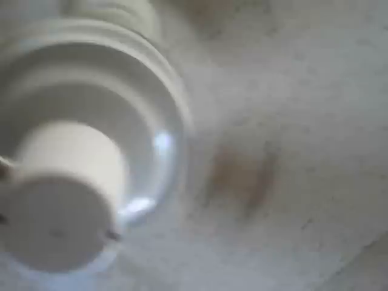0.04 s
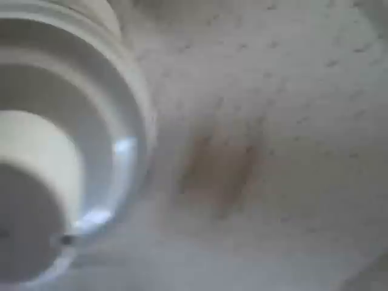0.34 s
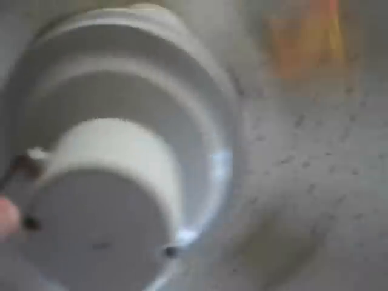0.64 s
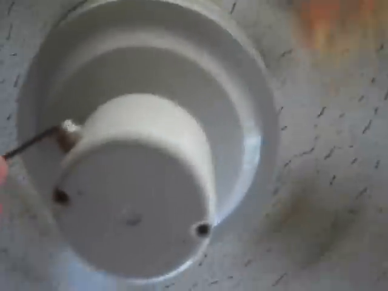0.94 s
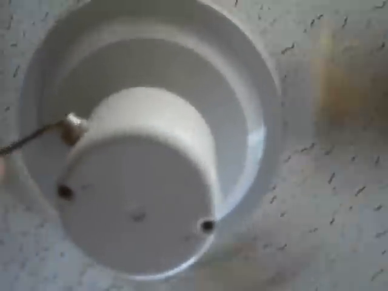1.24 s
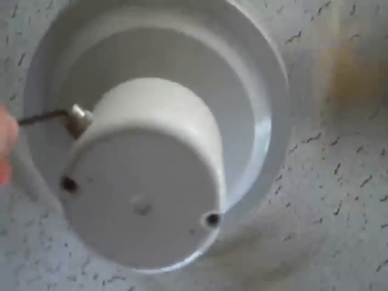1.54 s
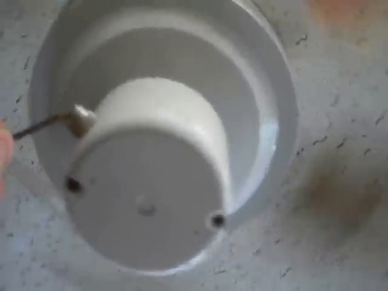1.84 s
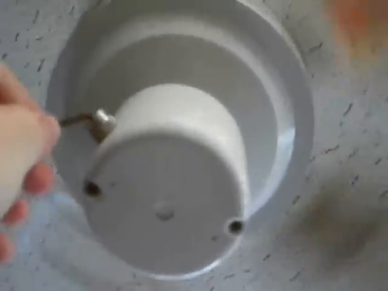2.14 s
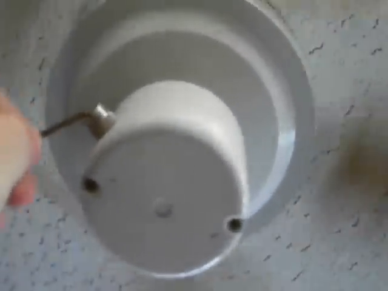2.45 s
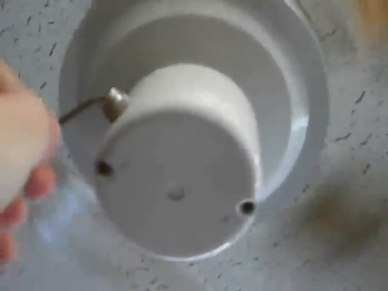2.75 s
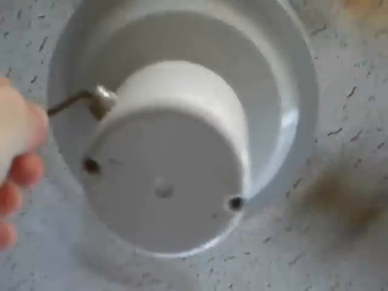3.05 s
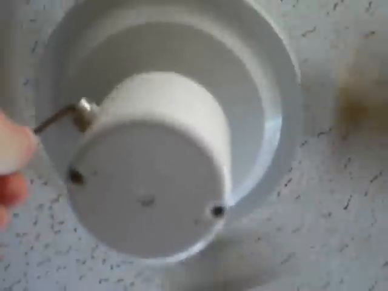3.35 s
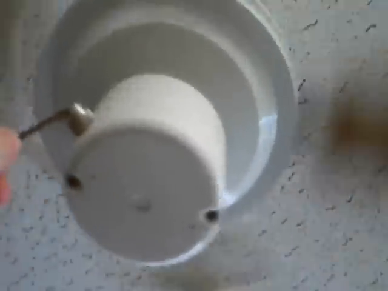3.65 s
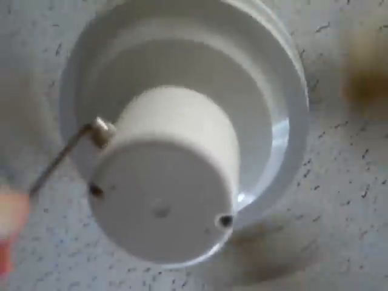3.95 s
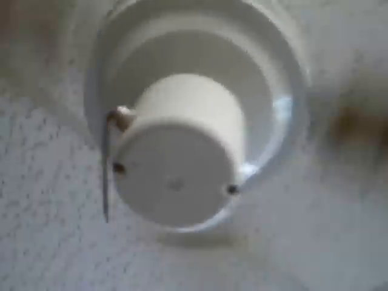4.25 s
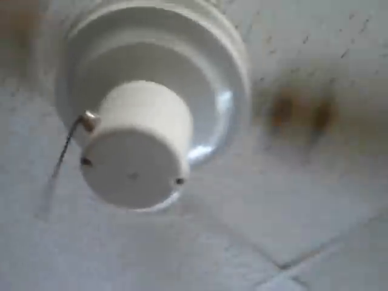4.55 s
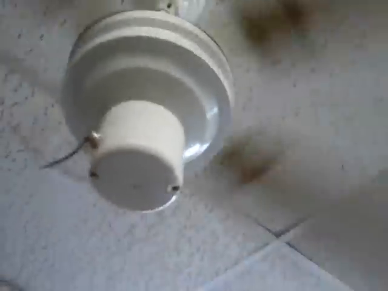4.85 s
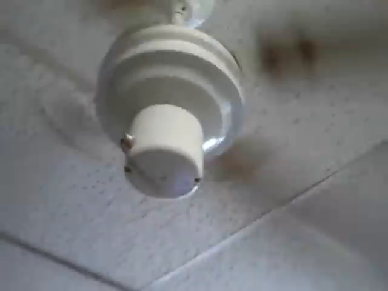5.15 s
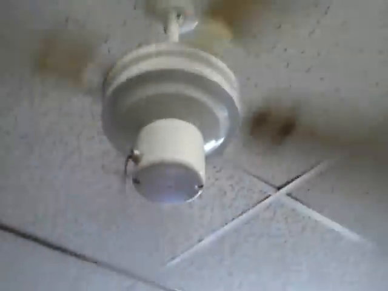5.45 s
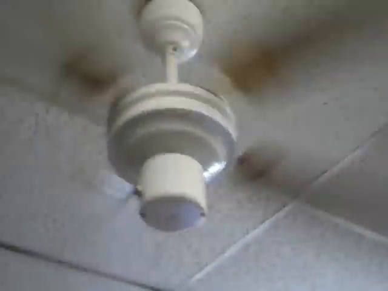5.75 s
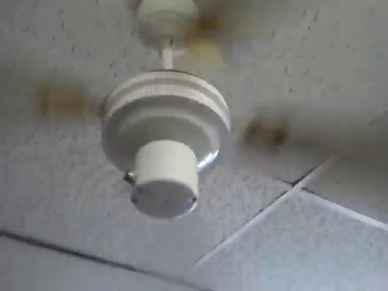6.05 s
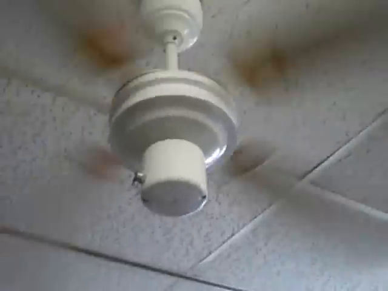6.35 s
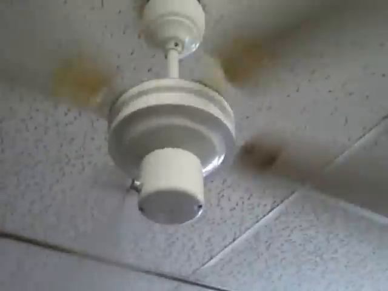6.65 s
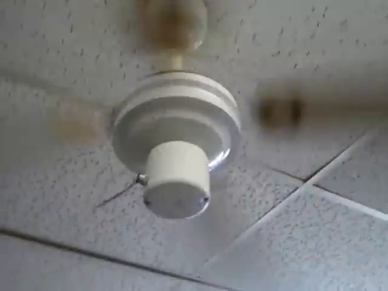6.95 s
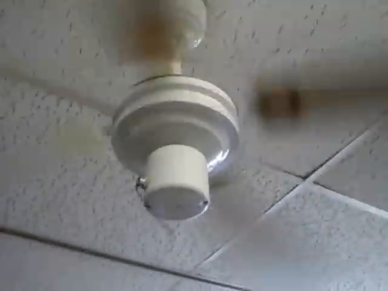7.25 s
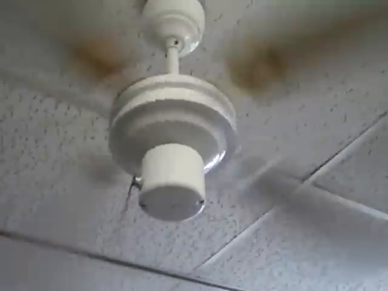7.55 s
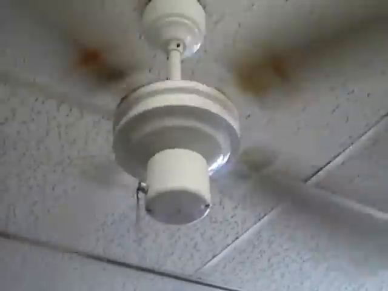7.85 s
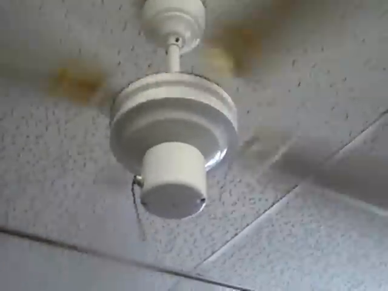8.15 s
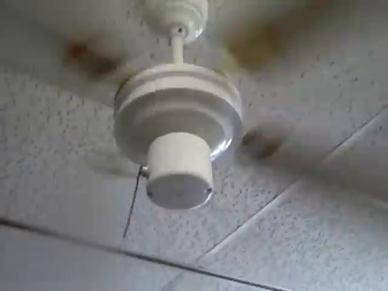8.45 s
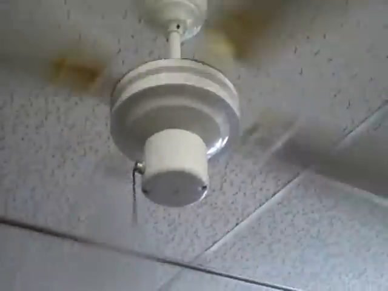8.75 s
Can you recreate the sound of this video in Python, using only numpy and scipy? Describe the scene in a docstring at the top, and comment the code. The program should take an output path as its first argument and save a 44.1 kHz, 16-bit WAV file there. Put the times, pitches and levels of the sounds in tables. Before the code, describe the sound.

Six sharp, briefly ringing clicks come in quick succession from the pull-chain switch of a running ceiling fan, close overhead in a small room. Beneath them the blades make a constant airy rush, and gusts thump softly on the cheap, slightly gritty microphone. A few faint chain ticks follow on the metal housing. The wind rumble then drops, leaving the even noise of moving air.

```python
"""A ceiling fan spins just above the microphone, in a small room with a tiled ceiling.
The blades rush steadily, and their downdraught buffets the microphone until it is drawn away.
Close overhead, a hand tugs the pull chain and the switch in the metal housing snaps six times.
Let go, the chain swings and ticks faintly against the housing."""
import sys
import numpy as np
from scipy import signal
from scipy.fft import rfft, irfft
from scipy.io import wavfile

SR = 44100
rng = np.random.default_rng(int(sys.argv[2]) if len(sys.argv) > 2 else 0)


def wav_out(sig):
    """Save sig, one row per channel (or a flat mono array), as 16-bit PCM at SR to the path in sys.argv[1]."""
    wavfile.write(sys.argv[1], SR, np.round(np.clip(np.atleast_2d(sig).T, -1, 1) * 32767).astype(np.int16))


N = 388521
TIME = np.arange(N) / SR


def from_db(db):
    """Decibels to gain."""
    return 10 ** (np.asarray(db) / 20)


def rms_one(x):
    """Scale to rms 1."""
    return x / np.sqrt(np.mean(x ** 2) + 1e-20)


def unit_energy(x):
    """Scale to energy 1."""
    return x / np.sqrt(np.sum(x ** 2) + 1e-20)


def in_time(rows):
    """Each column of a timed curve at every sample."""
    times, *columns = np.transpose(rows)
    return np.squeeze([np.interp(TIME, times, column) for column in columns])


def at_hz(points, hz):
    """Read a table on a log-frequency axis."""
    pitches, values = np.transpose(points)
    return np.interp(np.log(np.maximum(hz, 1)), np.log(pitches), values)


def nearness(hz, centre_hz, octaves):
    """A bell curve over pitch, 1 at its centre."""
    return np.exp(-(np.log2(hz / centre_hz) / octaves) ** 2)


def band(x, low_hz, high_hz, order=2):
    """Butterworth band-pass."""
    return signal.sosfilt(signal.butter(order, [low_hz, high_hz], "band", fs=SR, output="sos"), x)


def ring(x, hz, width_hz):
    """A resonance; a unit click sets a wave of height about 1 ringing."""
    radius, angle = np.exp(-np.pi * width_hz / SR), 2 * np.pi * hz / SR
    return signal.lfilter([.5, 0, -.5], [1, -2 * radius * np.cos(angle), radius ** 2], x + 1e-18)


def add(track, start_s, sound):
    """Mix a sound in at a time."""
    start = max(round(start_s * SR), 0)
    track[start:start + len(sound)] += sound[:N - start]


def blade_rush(level_db=-43.5, echo_hz=1050, echo_octaves=0.32, overtone_share=0.35, flutter_db=0.73):
    """Broad air noise, joined by its reflections between fan and ceiling about a millisecond apart."""
    # spectrum of the rushing air: frequency_hz, relative_db
    spectrum = [(22, 4), (60, -1), (120, -2), (170, -3), (250, -6), (500, -10.5), (850, -13), (1600, -15.5),
                (2400, -16.5), (3200, -17.5), (4500, -18.5), (5500, -19)]
    # the ceiling reinforces a pitch set by where the microphone is: time_s, pitch_hz, strength
    ceiling_echo = [(0.4, 975, 0.6), (0.8, 1130, 0.48), (3.7, 1170, 0.34), (4.5, 990, 0.62),
                    (5.9, 1116, 0.38), (8.8, 1080, 0.45)]
    hz = np.maximum(np.arange(N // 2 + 1) * SR / N, 1)
    low_cut = hz ** 2 / (hz ** 2 + 14 ** 2)
    air = irfft(rfft(rng.standard_normal(N)) * from_db(at_hz(spectrum, hz)) * low_cut, N)
    # the rough tiles mirror the midrange and scatter the rest
    mirrored = nearness(hz, echo_hz, echo_octaves)
    mirrored += overtone_share * nearness(hz, 2 * echo_hz, echo_octaves)
    pitch_hz, strength = in_time(ceiling_echo)
    echo = air
    for bounce in range(2):
        reflected = irfft(rfft(echo) * mirrored, N)
        echo = strength * np.interp(TIME - 1 / pitch_hz, TIME, reflected)
        air = air + echo
    flutter = rms_one(band(rng.standard_normal(N), 3.6, 29, order=1))
    return from_db(level_db + flutter_db * flutter) * rms_one(air)


def blade_wash(low_hz=210, high_hz=490):
    """Air tumbles off the blades: a hollow whoosh heard right under them."""
    # wash at the microphone: time_s, level_db
    levels = [(0, -50.5), (1.0, -48.5), (2.3, -53.5), (4.0, -62), (8.8, -68)]
    whoosh = rms_one(band(rng.standard_normal(N), low_hz, high_hz, order=3))
    return from_db(in_time(levels)) * whoosh


def rumble(low_hz, high_hz):
    """Turbulent air as low noise at rms 1, already under way at the start."""
    return rms_one(band(rng.standard_normal(N + SR), low_hz, high_hz)[SR:])


def eddy(t, half_width_ms, skirt=2.7):
    """A passing eddy: a pressure spike inside a wider trough."""
    offset = t / (half_width_ms / 1000)
    spike = (1 + offset ** 2) ** -2
    trough = (1 + (offset / skirt) ** 2) ** -2 / skirt
    return spike - trough


def buffeting(main_db=3, side_db=-5.5, swirl_db=-16, gap_s=.02, widening=1.25, scatter_db=2):
    """Lumpy draught on the microphone; each gust is a swirling run of eddies, strongest in the middle."""
    # draught at the microphone: time_s, level_db
    draught = [(0, -44), (1.0, -45.5), (2.1, -40), (3.4, -46.5), (4.5, -43), (4.9, -52), (5.7, -53.5),
               (8.8, -53)]
    # gusts hitting it: centre_s, relative_db, eddy_half_width_ms, swell_half_length_s
    gusts = [(0.1, -16.5, 1.8, 0.038), (0.194, -20, 2, 0.03), (1.351, -30, 5, 0.06),
             (1.673, -21, 1.8, 0.01), (1.723, -19.5, 3.9, 0.044), (2.074, -20, 5, 0.016),
             (2.124, -23.5, 3.2, .02), (2.286, -21, 2.7, 0.037), (2.374, -13.5, 1.97, 0.0059),
             (2.539, -18.5, 4.3, 0.013), (2.775, -25.5, 4.9, .03), (3.123, -18.5, 2.8, .011),
             (3.734, -26.5, 7.9, 0.025), (4.374, -20, 3.9, .025), (4.539, -20, 4.2, 0.044),
             (4.688, -24.5, 2.9, .015), (5.356, -32, 6, .03)]
    wind = from_db(in_time(draught)) * rumble(low_hz=20, high_hz=85)
    swirl = from_db(swirl_db) * rumble(low_hz=30, high_hz=130)
    slots = np.array([-3, -2, -1, 1, 2, 3])   # weaker eddies before and after the main one
    for centre_s, gust_db, half_width_ms, swell_s in gusts:
        centre = int(centre_s * SR)
        near = slice(max(centre - SR // 5, 0), centre + SR // 5)
        t = TIME[near] - centre_s
        delays = gap_s * (slots + rng.uniform(-0.41, 0.404, len(slots)))
        sizes = from_db(side_db + scatter_db * rng.standard_normal(len(slots)))
        side_eddies = sizes @ eddy(t - delays[:, None], widening * half_width_ms)
        main_eddy = from_db(main_db) * eddy(t, half_width_ms)
        swell = np.exp(-(t / swell_s) ** 2 / 2)
        wind[near] += from_db(gust_db) * (main_eddy + swell * (side_eddies + swirl[near]))
    return wind


def pawl_force(scrape_s=0.001437, scrape_db=-18, chatter_db=-28, chatter_s=0.0046):
    """The pawl scrapes off its tooth, slams home and chatters."""
    t = TIME[:SR // 8]
    chatter = from_db(chatter_db) * np.exp(-(t - scrape_s) / chatter_s)
    force = rng.standard_normal(len(t)) * np.where(t < scrape_s, from_db(scrape_db), chatter)
    force[int(scrape_s * SR)] = 1   # the slam
    return force


def housing(knock_hz, knock_db, ping_hz, ping_db, ping_octaves, knock_octaves=0.16,
            knock_focus_db=8, ping_focus_db=12, crack_db=15, mount_loss=0.028, scatter_db=2):
    """A blow on the metal housing: low modes knock, high ones ping; its spot favours a pitch of each."""
    # modes of the housing: pitch_hz, width_hz, relative_db
    modes = [(410, 79, 2), (730, 81, 1.5), (1018, 11, 0), (1247, 53, 0), (1990, 14, 1.5), (3170, 91, 1.5),
             (3396, 83, 0.5), (3720, 89, 0), (4000, 67, -1.5), (4210, 150, -0.5), (4500, 55, -2.5),
             (4516, 30, 1.5), (5100, 370, 4), (5310, 21, 2)]
    knock_below_hz, spread_s = 1500, .0003
    knock, ping = np.zeros((2, SR // 8))
    for hz, width_hz, mode_db in modes:
        # bending waves reach each mode a little apart in time
        lag = int(rng.random() * spread_s * SR)
        drive = np.pad(pawl_force(), (lag, 0))[:SR // 8]
        # a mode first swings hard and loses that energy to the mount, then rings on
        crack = from_db(crack_db) * ring(drive, hz, width_hz + mount_loss * hz)
        mode = unit_energy(crack + ring(drive, hz, width_hz))
        # no two blows share their force alike among the modes
        mode *= from_db(mode_db + scatter_db * rng.standard_normal())
        if hz < knock_below_hz:
            knock += from_db(knock_focus_db * nearness(hz, knock_hz, knock_octaves)) * mode
        else:
            ping += from_db(ping_focus_db * nearness(hz, ping_hz, ping_octaves)) * mode
    return from_db(knock_db) * unit_energy(knock) + from_db(ping_db) * unit_energy(ping)


def pull_switch(housing_gain_db=20, clack_gain_db=18, clack_width_hz=520, tick_hz=4100):
    """Snaps and chain ticks ring the housing into the room; the switch body's clack stays close, dry."""
    # switch snaps, levels before the gains:
    # start_s, clack_hz, clack_db, knock_hz, knock_db, ping_hz, ping_db, ping_spread_octaves
    snaps = [(0.9271, 2170, -26.5, 1050, -23.5, 5550, -25, 0.15),
             (1.2090, 2400, -30.5, 400, -35, 4600, -21, 0.16),
             (1.6144, 2260, -25.5, 700, -30.5, 4700, -25.5, 0.18),
             (1.9346, 2470, -28.5, 1280, -35, 3800, -22.5, 0.85),
             (2.306, 2570, -31, 990, -30.5, 4080, -20, 0.17), (2.7406, 2650, -28, 1040, -34, 4250, -23, .3)]
    # loose chain touching the housing: start_s, relative_db
    chain_ticks = [(4.123, -46), (4.155, -44), (4.764, -52), (5.135, -44.5)]
    rings, clacks = np.zeros((2, N))
    for start_s, clack_hz, clack_db, *blow in snaps:
        add(rings, start_s, housing(*blow))
        body = ring(pawl_force(), clack_hz, clack_width_hz)
        clack = unit_energy(ring(body, clack_hz, 2 * clack_width_hz))
        add(clacks, start_s, from_db(clack_db + clack_gain_db) * clack)
    for start_s, tick_db in chain_ticks:
        # a tick is nearly all ping
        tick = housing(tick_hz, knock_db=tick_db - 13, ping_hz=tick_hz, ping_db=tick_db, ping_octaves=.4)
        add(rings, start_s, tick)
    return clacks + from_db(housing_gain_db) * (rings + room(rings))


def room(x, wet_db=-6, walls_s=0.013, early_db=-11):
    """Weak scatter from the ceiling, then dense wall echoes that linger longest in the low treble."""
    # decay of the small room: frequency_hz, t60_s
    decay = [(500, 0.22), (2000, 0.27), (3500, 0.36), (5500, 0.21)]
    t = TIME[:SR // 2]
    edges_hz = np.geomspace(200, 7000, 7)
    white = rng.standard_normal((2, len(t)))
    tail = np.zeros(len(t))
    for k, (low, high) in enumerate(zip(edges_hz, edges_hz[1:])):
        t60_s = at_hz(decay, np.sqrt(low * high))
        tail += band(white[k % 2], low, high) * from_db(-60 * t / t60_s)
    tail *= np.where(t < walls_s, from_db(early_db), 1) * (t > .002)
    return from_db(wet_db) * signal.fftconvolve(x, unit_energy(tail))[:N]


def scene():
    """The switch snaps over the moving air, at one microphone under the fan."""
    return (pull_switch() + blade_rush() + blade_wash() + buffeting())[None]


def record(dry, band_hz=5480, hold_samples=4, late_share=0.016, cutoff_hz=15850, dc_offset=-.0248):
    """A cheap camera samples at a quarter rate and holds each value, mirroring a gritty treble."""
    narrow = signal.sosfilt(signal.butter(10, band_hz, fs=SR, output="sos"), dry)
    # now and then a step comes one sample late
    late = rng.random(N) < late_share
    steps = np.maximum(np.arange(N) - late, 0) // hold_samples
    held = narrow[:, steps * hold_samples]
    top_cut = signal.ellip(12, .1, 70, cutoff_hz, fs=SR, output="sos")
    return signal.sosfilt(top_cut, held) + dc_offset


dry = scene()
out = record(dry)
wav_out(out)
```